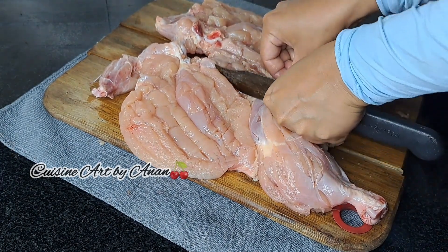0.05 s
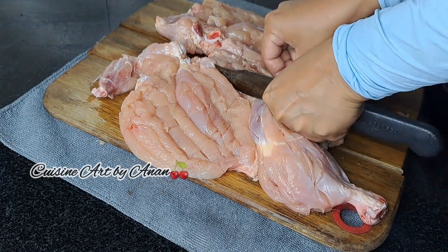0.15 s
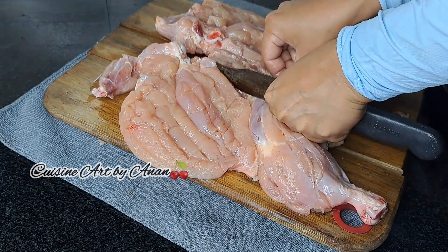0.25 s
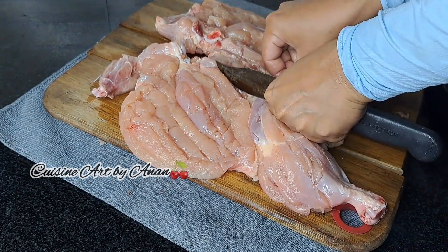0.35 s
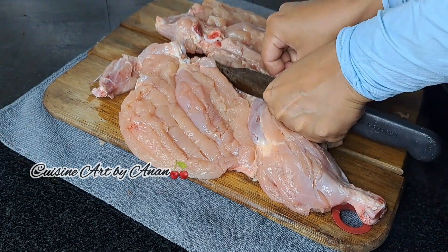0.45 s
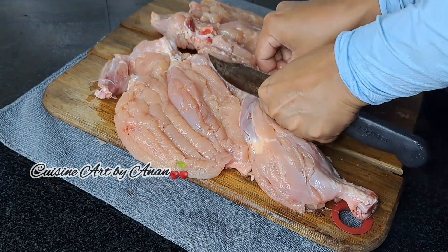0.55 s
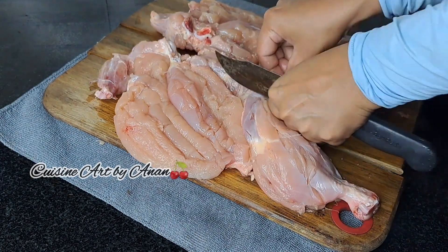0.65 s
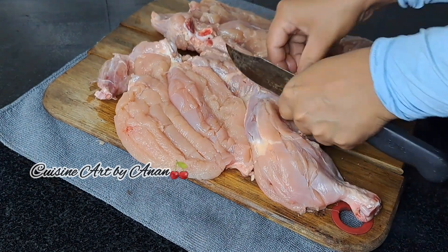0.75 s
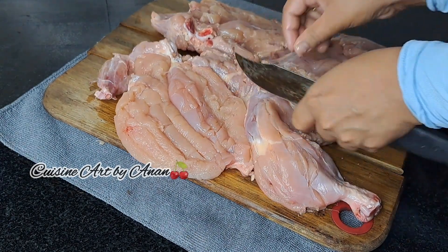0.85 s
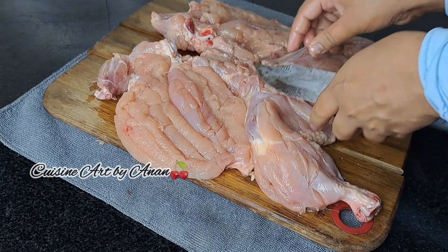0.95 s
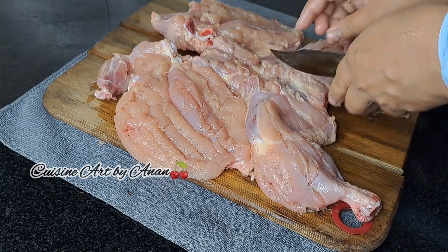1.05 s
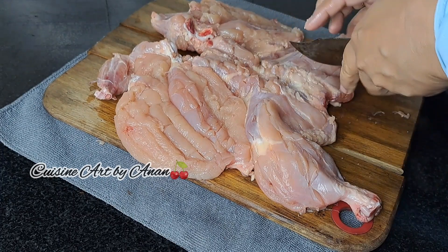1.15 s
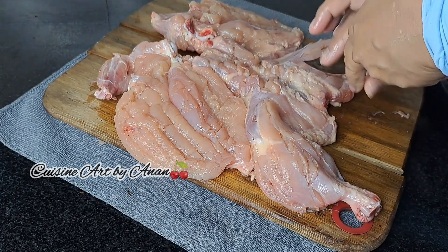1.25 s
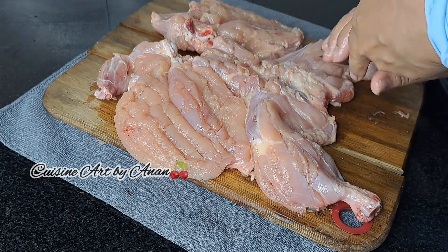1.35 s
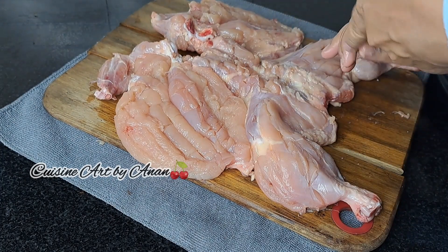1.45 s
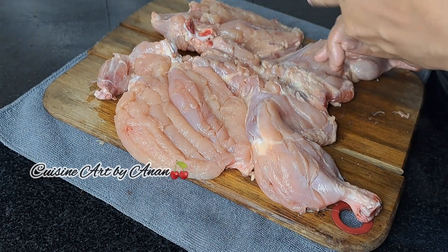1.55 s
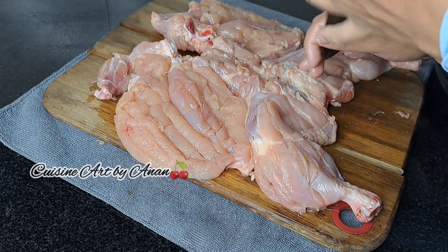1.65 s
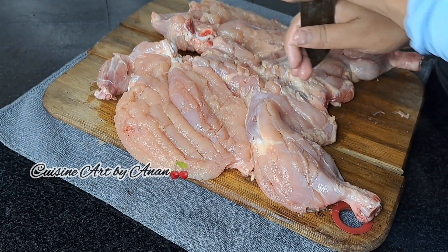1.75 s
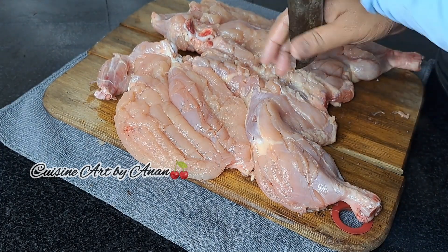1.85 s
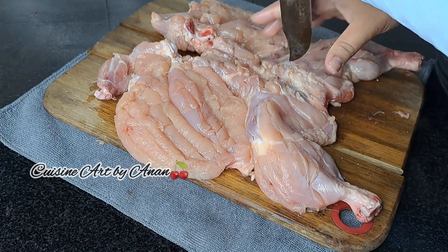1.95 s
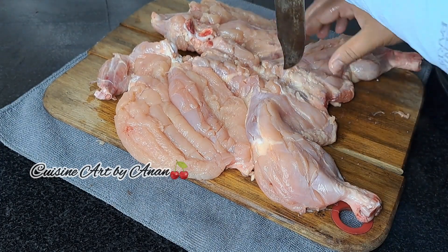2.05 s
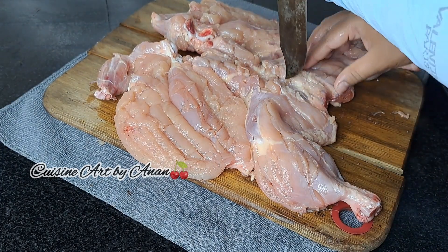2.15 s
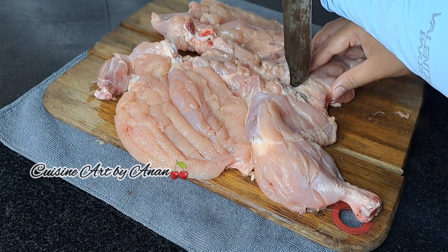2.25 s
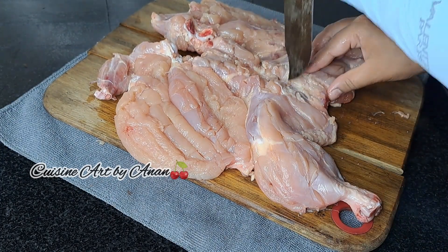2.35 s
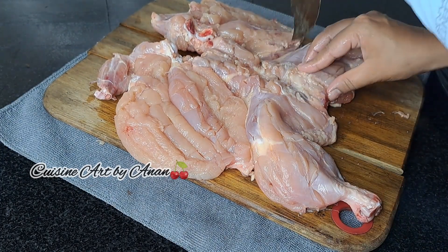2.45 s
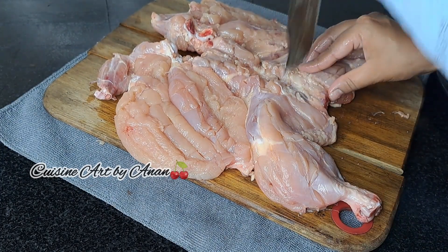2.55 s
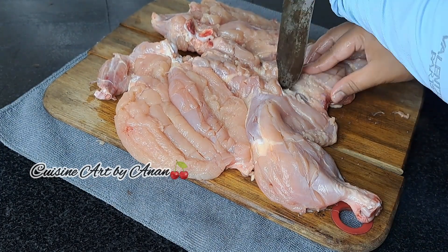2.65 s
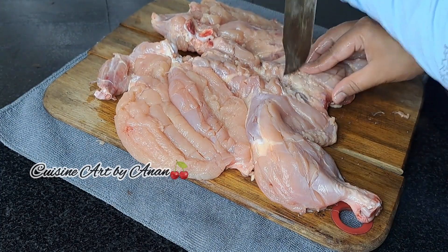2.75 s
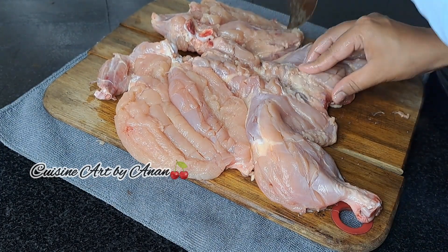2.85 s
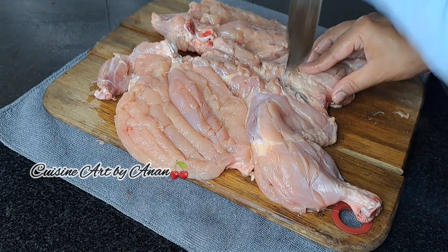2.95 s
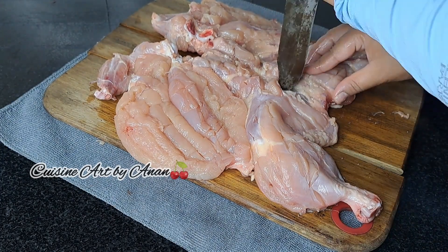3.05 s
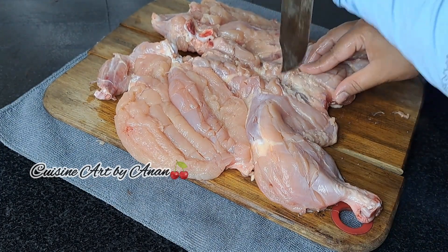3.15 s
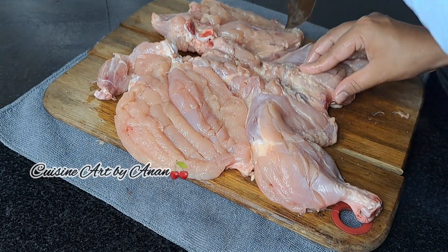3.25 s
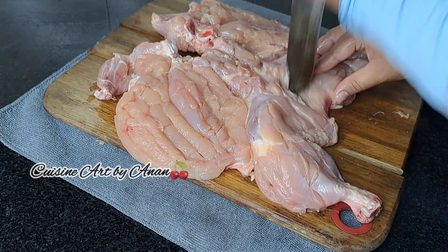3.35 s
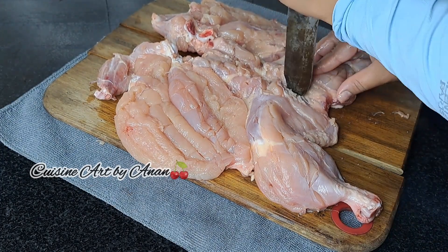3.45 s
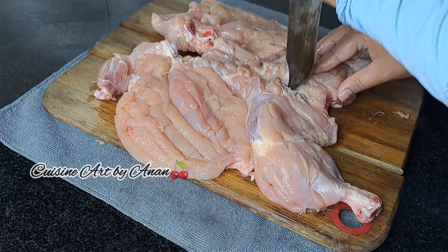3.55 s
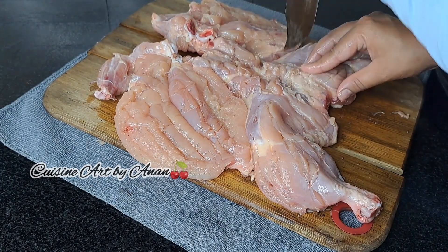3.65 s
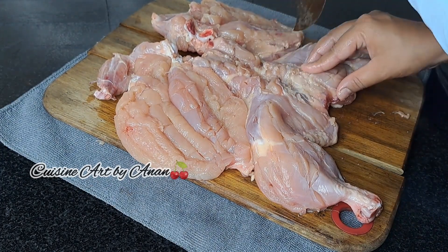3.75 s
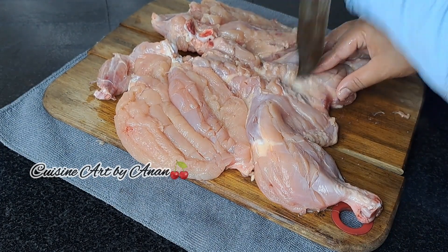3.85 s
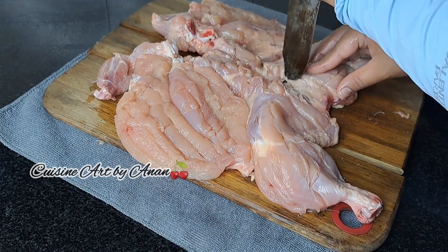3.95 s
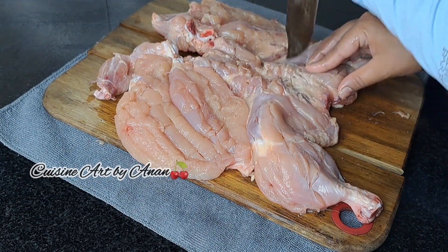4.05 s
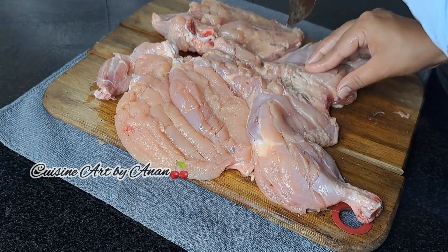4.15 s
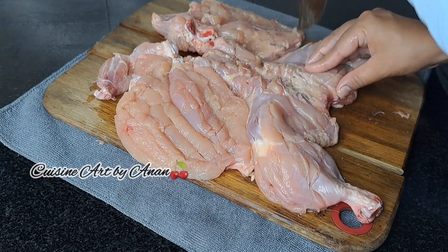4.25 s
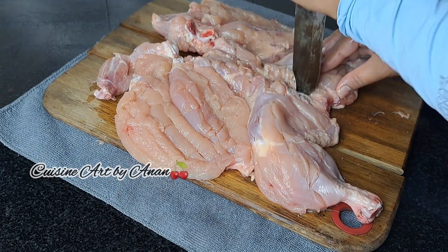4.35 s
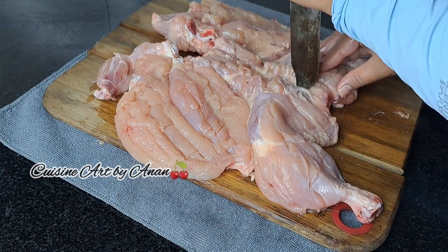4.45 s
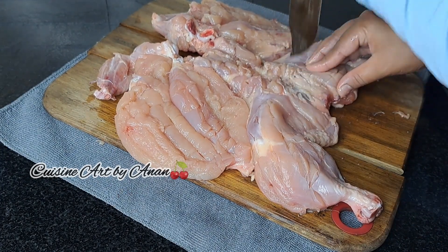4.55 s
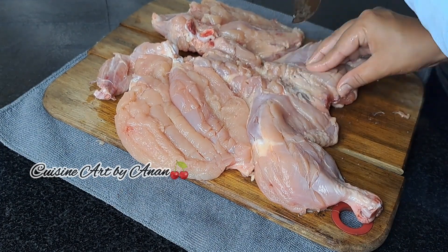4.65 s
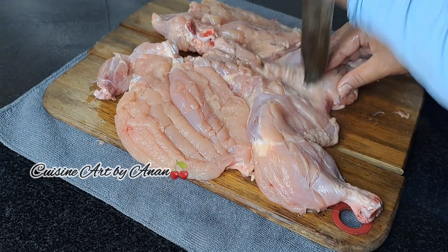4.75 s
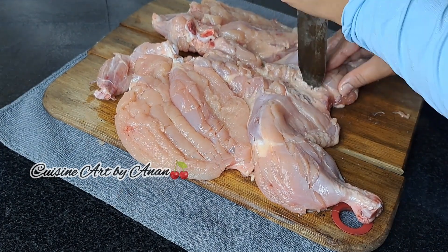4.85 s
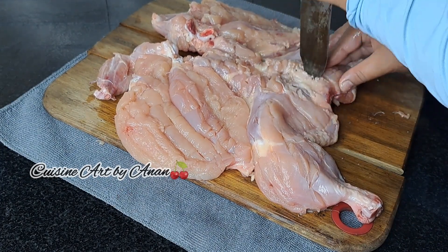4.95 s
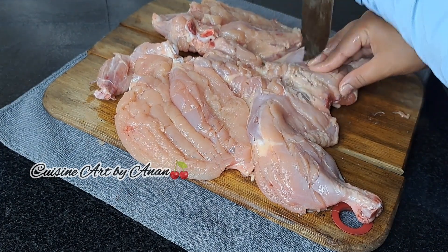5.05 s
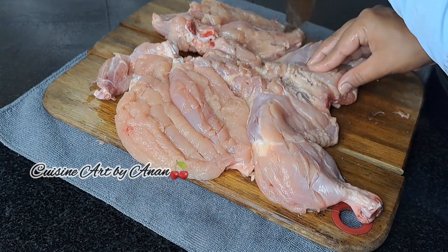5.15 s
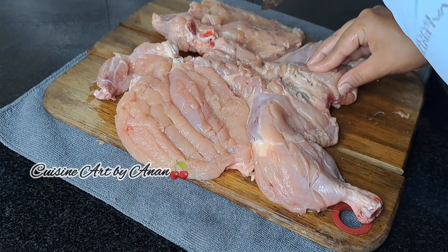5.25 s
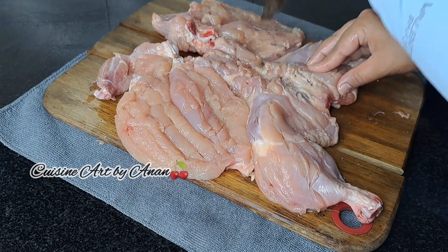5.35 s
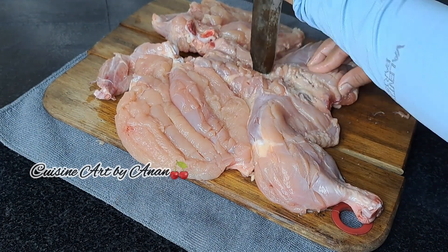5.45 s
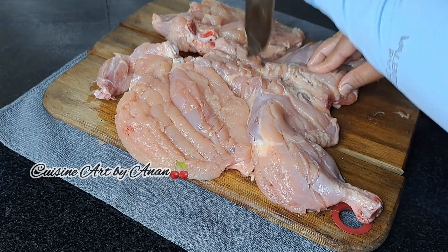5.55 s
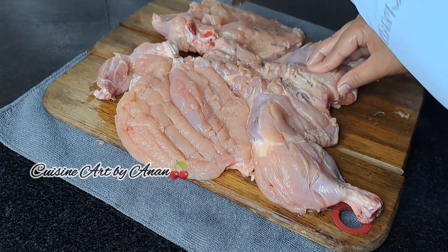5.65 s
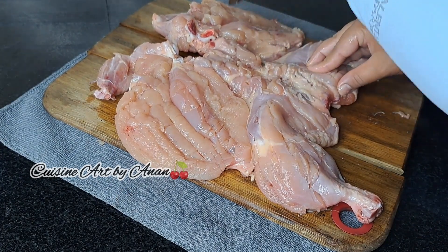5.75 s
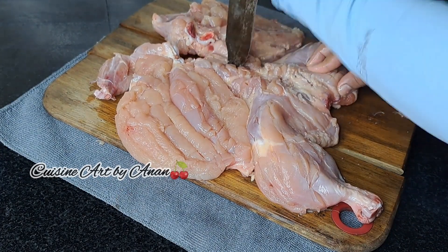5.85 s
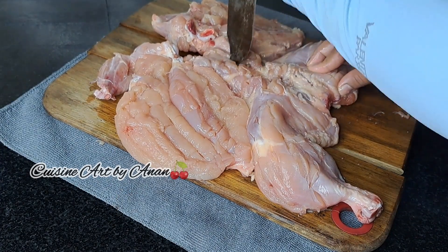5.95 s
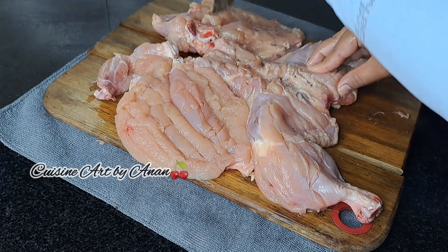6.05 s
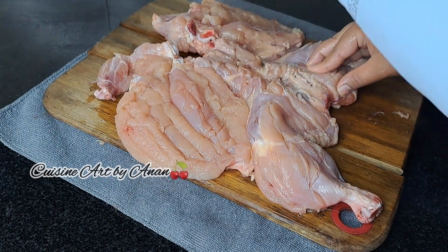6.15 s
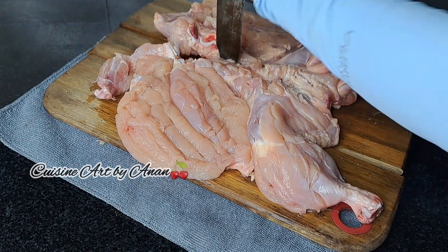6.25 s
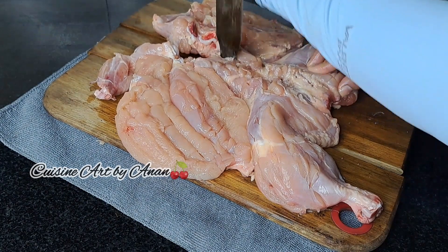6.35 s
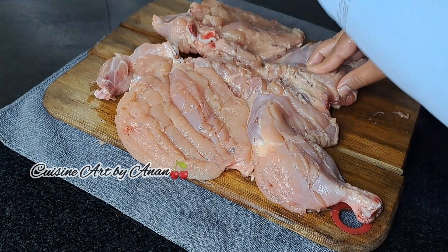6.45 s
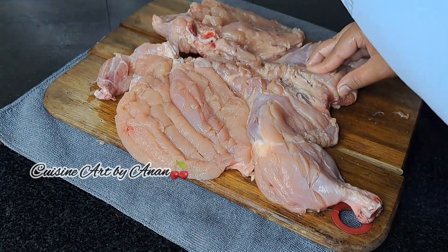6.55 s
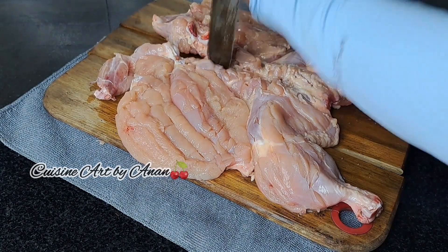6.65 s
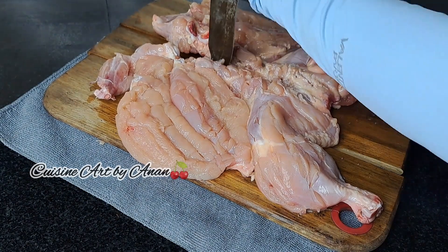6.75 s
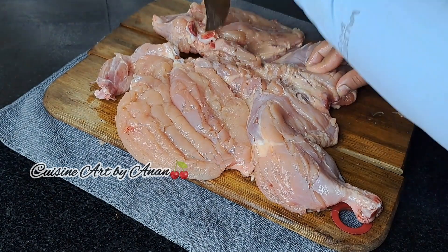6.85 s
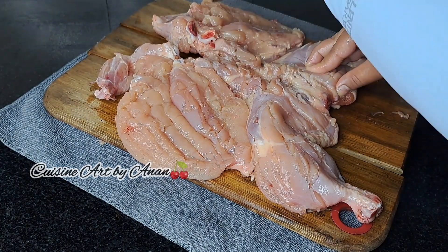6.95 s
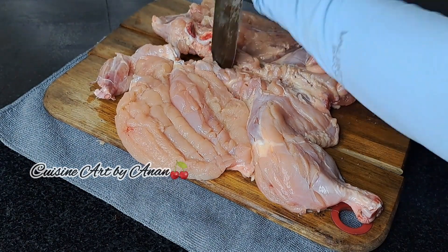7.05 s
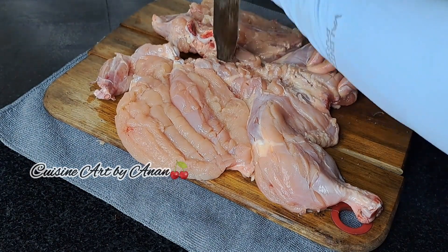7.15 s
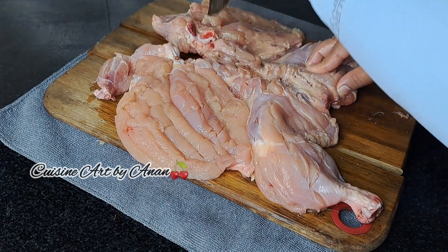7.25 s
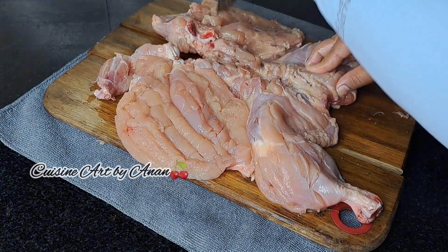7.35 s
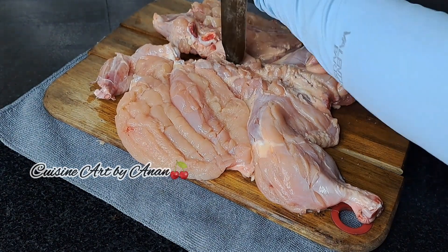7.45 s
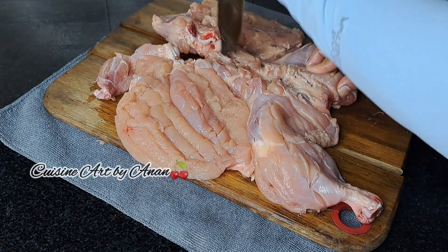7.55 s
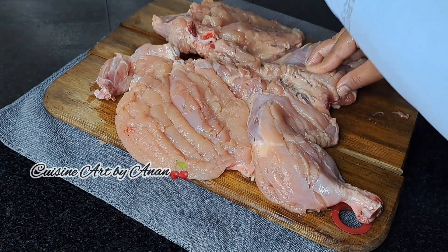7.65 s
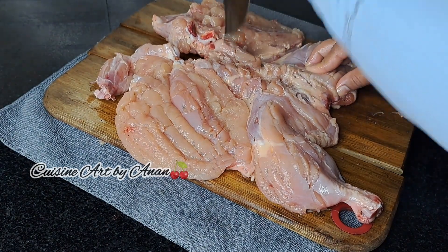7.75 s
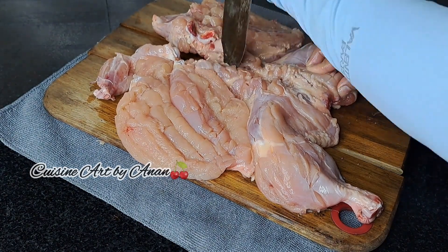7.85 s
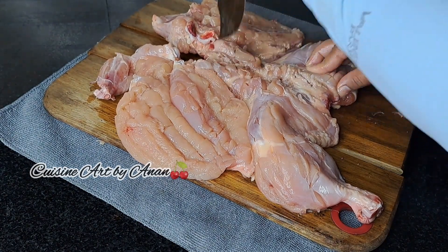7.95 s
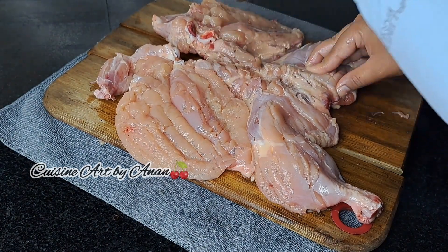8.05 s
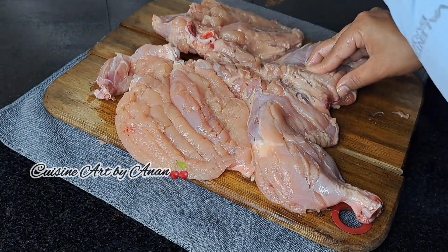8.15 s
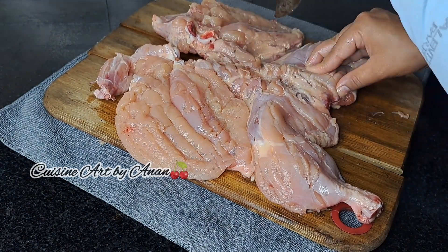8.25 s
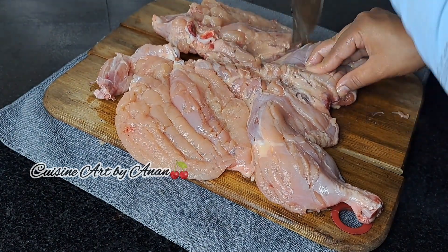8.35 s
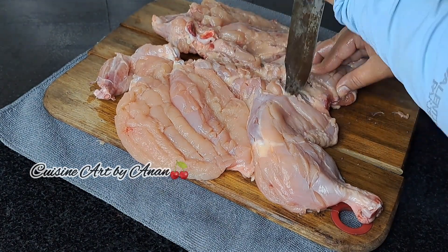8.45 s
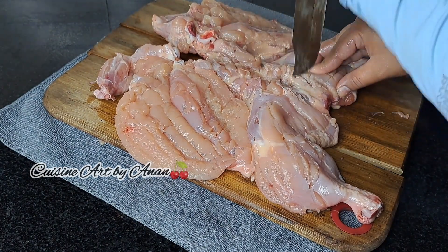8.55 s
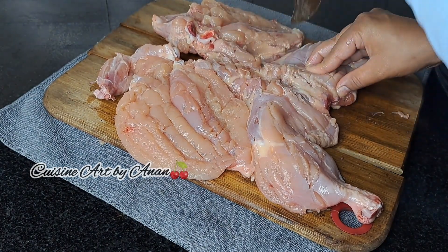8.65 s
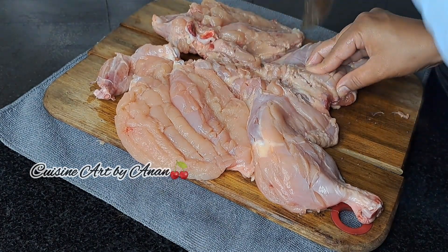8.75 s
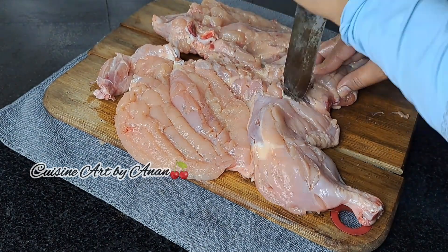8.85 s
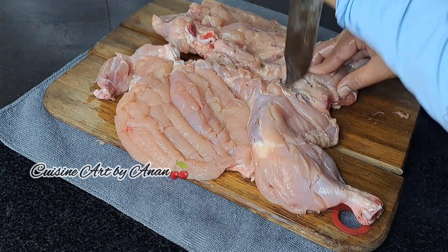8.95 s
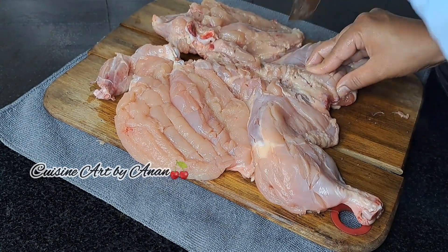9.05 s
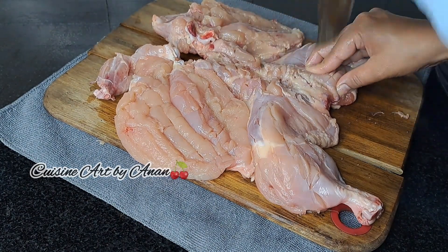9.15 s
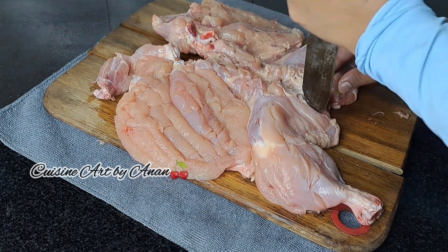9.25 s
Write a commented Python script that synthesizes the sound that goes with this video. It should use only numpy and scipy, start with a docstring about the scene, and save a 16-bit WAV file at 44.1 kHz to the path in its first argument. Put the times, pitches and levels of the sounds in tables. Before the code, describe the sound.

Nearly quiet at first, with high cricket chirps and delicate moist handling of meat. From about two and a half seconds, sixteen sharp chops land fairly steadily, some light, some loud enough to dominate everything. Each slaps flesh, tears wetly and knocks the wooden board, making the worktop boom briefly. Bone snaps and a short blade rasp add detail. The pickup is close, in a reflective kitchen, with distant motor rush behind.

```python
"""Knife work on raw chicken in a hard-walled kitchen, dry sounds plus worktop modes and noise-built reverberation.
From the start: soft swells of hiss and wet pops, skin ticks, a soft flop; faint insects, a distant motor's rush.
From 2.6 s: about 2.3 blows a second, each a flesh slap, crunching grains and a board thud with a blade clack.
Some blows add bone cracks or ringing bone. A low hum picks up about halfway, with an uneven level, and the
blade rasps free. Insects are falling whistles and bands of noise."""
import sys
import numpy as np
from scipy import signal
from scipy.fft import rfft, irfft, next_fast_len
from scipy.io import wavfile

SR = 44100
rng = np.random.default_rng(int(sys.argv[2]) if len(sys.argv) > 2 else 0)


def unload_wav(signal):
    """Save mono or channel-first audio to the path in sys.argv[1] as 16-bit WAV at rate SR, clipped to [-1, 1]."""
    wavfile.write(
        sys.argv[1],
        SR,
        np.round(np.clip(np.atleast_2d(signal).T, -1, 1) * 32767).astype(np.int16),
    )


N = 410571
TIME_S = np.arange(N) / SR


def undb(db):
    """Decibels to amplitude gain."""
    return 10 ** (np.asarray(db) / 20)


def unit(x):
    """Scale to rms 1."""
    return x / np.sqrt(np.mean(x ** 2) + 1e-20)


def add(track, s, sound):
    """Mix a sound into a track from time s on."""
    i = max(int(s * SR), 0)
    part = track[..., i:i + sound.shape[-1]]
    part += sound[..., :part.shape[-1]]


def colour(x, points):
    """Filter by a spectrum of (Hz, dB) points, interpolated over log frequency."""
    hz, db = np.transpose(points)
    n = next_fast_len(x.shape[-1] + SR // 20)
    f = np.maximum(np.fft.rfftfreq(n, 1 / SR), 1)
    gain = undb(np.interp(np.log(f), np.log(hz), db))
    return irfft(rfft(x, n) * gain, n)[..., :x.shape[-1]]


def resonate(x, hz, width_hz):
    """One resonance, gain 1 at its centre."""
    b, a = signal.iirpeak(min(hz, SR / 2 - 1), hz / min(width_hz, SR / 3), fs=SR)
    return signal.lfilter(b, a, x)


def resonate_twice(x, hz, width_hz):
    """Two equal resonances in series: steeper skirts."""
    return resonate(resonate(x, hz, width_hz), hz, width_hz)


def ring(x, response):
    """Convolve with one impulse response per channel."""
    return signal.fftconvolve(np.atleast_2d(x), response, axes=1)[:, :N]


def spread(pair, likeness):
    """Mix two unrelated signals into left and right with the given correlation."""
    c = np.clip(likeness, -1, 1)
    side = pair[1] * np.array([[1], [-1]])
    return np.sqrt((1 + c) / 2) * pair[0] + np.sqrt((1 - c) / 2) * side


def noise(n, likeness):
    """Stereo white noise with the given correlation."""
    return spread(rng.standard_normal((2, n)), likeness)


def grains(length_s, rate_hz, scatter_db):
    """Tiny ruptures of very unequal size, at the same instants in both channels."""
    n = int(length_s * SR)
    size = undb(scatter_db * np.minimum(rng.exponential(size=n), 4))
    happens = rng.random(n) < rate_hz / SR
    return unit(size * happens * rng.standard_normal((2, n)))


def buzz(n, hz, width_hz):
    """A steep band of noise, rms 1: many wing strokes blurred by distance."""
    return unit(resonate_twice(rng.standard_normal((2, n)), hz, width_hz))


def swelling(hz):
    """Slow random level curve around the given rate, rms 1."""
    return unit(resonate_twice(rng.standard_normal(N), hz, hz))


def thud(hz):
    """Pressure from a short push on the board: dip, crest, dip; centred in 20 ms."""
    a = (np.pi * hz * (np.arange(SR // 50) / SR - 1 / 100)) ** 2
    return (1 - 2 * a) * np.exp(-a)


# blows: (board contact t/s, time in meat/s, thud peak level/dB, thud f/Hz,
#         gristle crunch level/dB, wet crackle level/dB)
BLOWS = [(2.6177, .008, -27.5, 222, -43, -49), (3.0147, .009, -13.5, 354, -38.5, -49.5),
         (3.4068, .018, -1, 374, -31.5, -28), (3.9064, .013, -22, 314, -42.5, -45),
         (4.3633, .009, -8, 355, -26.5, -34.5), (4.8138, .027, -13.5, 333, -30.5, -35.5),
         (5.459, .02, -20, 337, -34.5, -41), (5.885, .007, -13.5, 279, -33.5, -41.5),
         (6.286, .014, -2, 354, -28, -40), (6.7036, .006, -5.5, 352, -28.5, -58),
         (7.0819, .009, -18, 302, -36, -37), (7.4624, .017, -2, 372, -51.5, -39),
         (7.8529, .017, -20.5, 386, -39.5, -65), (8.4603, .006, -27, 284, -39.5, -42.5),
         (8.8655, .014, -13.5, 294, -30, -34), (9.259, .01, -3, 340, -26.5, -39.5)]
# thick bones checking the blade: (t/s, knock peak level/dB, knock f/Hz, ring level/dB, ring f/Hz)
THICK_BONES = [(4.798, -15.5, 460, -32.5, 714), (5.4482, -18, 272, -33.5, 1496),
               (8.8585, -13, 444, -34.5, 1220)]
# blade resonances, damped by meat: (f/Hz, width/Hz, level/dB)
BLADE_MODES = [(733, 410, 5), (1457, 715, 2.5), (2220, 660, 3), (3000, 600, -5.5), (4500, 4300, -12)]
# clack level under a full-scale thud; clack dB per thud dB (above 1: hard blows are brighter)
CLACK_DB, CLACK_GROWTH = -21, 1.61


def knocks(clack_s=0.0011, lead_s=.0015):
    """Board or bone stops the edge: a thud pulse, and contact noise rings the blade, more so when hard."""
    out, t = np.zeros((2, N)), np.arange(SR // 25) / SR
    stops = [(s, db, hz) for s, _, db, hz, _, _ in BLOWS] + [bone[:3] for bone in THICK_BONES]
    for s, db, hz in stops:
        add(out, s - 1 / 100, undb(db) * thud(hz))
        contact = noise(len(t), 0.27) * np.exp(-t / clack_s)
        clack = sum(undb(g) * resonate_twice(contact, f, w) for f, w, g in BLADE_MODES)
        clack = clack / clack[:, :SR // 200].std()  # rms 1 over first 5 ms
        add(out, s - lead_s, clack * undb(CLACK_DB + CLACK_GROWTH * db))
    return out


# gristle tearing spectrum: (f/Hz, level/dB per Hz)
CRUNCH_SPECTRUM = [(200, -2.5), (600, 8), (1000, 1.5), (1400, 3.5), (2500, -8), (4000, -20), (8000, -26.5)]
# wet tearing spectrum: (f/Hz, level/dB per Hz)
CRACKLE_SPECTRUM = [(1500, -9), (3500, -2), (5500, -4.5), (7800, 2), (10000, -5), (15500, -5.5)]
SLAP_DB, SLAP_GROWTH = -7, 0.55  # slap at 0 dB mean tearing; slap dB per tearing dB


def cuts(slap_hz=540, slap_t60_s=0.031, build_db=5, release_s=0.0069):
    """The edge slaps flesh, louder where tough, then tears fibres harder and harder until it stops."""
    out, t = np.zeros((2, N)), np.arange(SR // 10) / SR
    for lands_s, length_s, _, _, gristle_db, wet_db in BLOWS:
        s = lands_s - length_s
        slap_db = SLAP_DB + SLAP_GROWTH * (gristle_db + wet_db) / 2
        hz = slap_hz * (1 + .06 * rng.standard_normal())
        slap = np.sqrt(2) * np.sin(2 * np.pi * hz * t) * undb(-60 * t / slap_t60_s)
        add(out, s, -slap * (1 - np.exp(-t / 0.00055)) * undb(slap_db))
        build = undb(build_db * (np.minimum(t / length_s, 1) - 1))
        force = build * np.exp(-np.maximum(t - length_s, 0) / release_s)
        for spectrum, db in (CRUNCH_SPECTRUM, gristle_db), (CRACKLE_SPECTRUM, wet_db):
            tearing = unit(colour(spread(grains(1 / 10, 9000, 3.1), 0.38), spectrum))
            add(out, s, tearing * force * undb(db))
    return out


# bone splinters: (t/s, level/dB)
BONE_SNAPS = [(2.6147, -38), (3.013, -40.5), (3.401, -33), (3.9091, -33.5), (4.8, -33), (5.4565, -34.5),
              (7.083, -32), (7.851, -31.5), (8.463, -40), (8.861, -26.5)]
# wet skin coming unstuck: (t/s, level/dB)
SKIN_TICKS = [(.577, -50.5), (.675, -49), (.79, -55.5), (3.583, -49), (6.43, -50.5), (8.512, -46.5)]
SNAP_HZ, TICK_HZ = 8300, 8100


def snaps(decay_s=0.0027, relative_width=0.57):
    """Bone gives way, or wet skin lets go: a decaying noise burst in a broad high resonance."""
    out, t = np.zeros((2, N)), np.arange(SR // 100) / SR
    for events, hz in (BONE_SNAPS, SNAP_HZ), (SKIN_TICKS, TICK_HZ):
        for s, db in events:
            burst = noise(len(t), 0.33) * np.exp(-t / decay_s)
            crack = resonate(burst, hz, relative_width * hz)
            crack = crack / crack[:, :SR // 400].std()  # rms 1 over first 2.5 ms
            add(out, s, crack * undb(db))
    return out


def scrape(length_s, hz, width_hz, rate_hz=2200, scatter_db=4, taper=.5):
    """Stick and slip in one resonance, swelling and fading."""
    slips = resonate_twice(spread(grains(2 * length_s, rate_hz, scatter_db), 0.84), hz, width_hz)
    slips = slips[:, -int(length_s * SR):]  # drop filter onset
    return unit(slips) * signal.windows.tukey(slips.shape[1], min(taper, 1))


# rasp of the blade pulled from bone: (f/Hz, width/Hz, level/dB)
RASP_BANDS = [(1300, 1100, -56.5), (3770, 1200, -57), (8500, 10000, -45)]
PULL_S, PULL_LENGTH_S = 4.992, 0.062
BONE_DECAY_S, BONE_WIDTH_HZ, BONE_GRIT_DB = .018, 300, 0


def grinding(rate_hz=3000, scatter_db=2):
    """Steel grinds into thick bones, which ring as tone plus grit; it rasps once when pulled free."""
    out, t = np.zeros((2, N)), np.arange(SR // 10) / SR
    for s, _, _, db, hz in THICK_BONES:
        grit = resonate_twice(spread(grains(1 / 5, rate_hz, scatter_db), 0.65), hz, BONE_WIDTH_HZ)
        grit = unit(grit[:, -len(t):])  # drop filter onset
        bone = np.sin(2 * np.pi * hz * t) + undb(BONE_GRIT_DB) * grit
        envelope = (1 - np.exp(-t / 0.00082)) * np.exp(-t / BONE_DECAY_S)
        add(out, s, bone * envelope * undb(db))
    for hz, width_hz, db in RASP_BANDS:
        add(out, PULL_S, scrape(PULL_LENGTH_S, hz, width_hz) * undb(db))
    return out


# soft swells of hiss and wet pops: (t/s, length/s, level/dB, centre f/Hz)
SOFT_SWELLS = [(0, 0.27, -68.5, 10900), (.34, .15, -69, 2530), (0.491, .21, -61, 1620),
               (.72, .52, -61.5, 380), (1.342, .13, -68.5, 1590), (1.678, .42, -70, 8750)]
# pop spectrum: (f/Hz, level/dB per Hz)
SQUELCH_SPECTRUM = [(60, -17), (150, -6), (450, 1.5), (1700, -3.5), (4000, -7), (15000, -10)]
FLOP_S, FLOP_DB, FLOP_HZ = .66, -47, 202


def swells_and_flop(rate_hz=2400, scatter_db=4.0, squish_db=9, relative_width=.6):
    """Dense tiny pops in one resonance make soft swells of hiss and wet pops; the meat flops once, softly."""
    out = np.zeros((2, N))
    for s, length_s, db, hz in SOFT_SWELLS:
        pops = colour(grains(length_s, rate_hz, scatter_db), SQUELCH_SPECTRUM)
        pops = pops + undb(squish_db) * resonate(pops, hz, relative_width * hz)
        add(out, s, unit(pops) * signal.windows.tukey(pops.shape[1], .8) * undb(db))
    add(out, FLOP_S - 1 / 100, undb(FLOP_DB) * thud(FLOP_HZ))
    return out


# modes of board, worktop and room bass: (f/Hz, relative level/dB, t60/s)
WORKTOP_MODES = [(63, -6.5, .6), (81.7, -9, 0.84), (101.8, -3.5, 0.93), (160.9, 2.5, 0.4),
                 (203, -3.5, 0.36), (233.7, 3.5, 0.34), (253.3, -2.5, 0.47), (294, 2.5, 0.4),
                 (324, -12, 0.84), (355, -1.5, 0.44), (425, 15, 0.039), (429, -11.5, 0.11),
                 (471, -2.5, 0.17), (484, 0.5, 0.44), (520.5, 0.5, 0.43), (556, -4, 0.52),
                 (685, -3.5, 0.52), (773, -5, 0.37), (821, -2.5, 0.75)]


def worktop(x, ring_db=-58, place_db=3, rise_s=0.0019, side_db=-9):
    """Modes ring on; each blow's new spot reweights them, the higher ones more unlike at each side."""
    t, out = np.arange(SR) / SR, np.zeros((2, N))
    hz, db, t60_s = np.transpose(WORKTOP_MODES)[:, :, None]
    decay = undb(ring_db + db - 60 * t / t60_s) * (1 - np.exp(-t / rise_s))
    modes = decay * np.exp(2j * np.pi * hz * t)
    count = len(modes)
    starts = [0] + [int(blow[0] * SR) - SR // 20 for blow in BLOWS] + [N]
    for a, b in zip(starts, starts[1:]):
        weights = undb(place_db * rng.uniform(-1, 1, count)) * np.exp(2j * np.pi * rng.random(count))
        side_phase = np.exp(2j * np.pi * rng.random(count))
        side = undb(side_db) * np.minimum(hz.T / 300, 1) ** 2 * side_phase
        stereo_weights = weights * (1 + side * np.array([[1], [-1]]))
        response = (stereo_weights @ modes).imag
        add(out, a / SR, signal.fftconvolve(x[:, a:b], response, axes=1))
    return out


# reverberation bands: (centre f/Hz, relative level/dB, t60/s)
KITCHEN_BANDS = [(60, 6.5, 0.4), (142, -8.5, 0.95), (296, -9, 0.78), (604, -3, 0.5), (1180, 0, 0.53),
                 (2314, 2.5, 0.52), (4280, 2.5, 0.5), (7900, -5.5, 0.53), (13760, 1, 0.39)]


def kitchen(x, wet_db=-2, alike_hz=520, build_s=0.0023, early=0.75, early_s=0.0075):
    """Strong early reflections off worktop and tiles, then a diffuse tail; only bass is alike at both sides."""
    t, response = np.arange(SR) / SR, 0
    centres_hz = np.array(KITCHEN_BANDS)[:, 0]
    edges_hz = [30, *np.sqrt(centres_hz[1:] * centres_hz[:-1]), SR / 2 - 1]
    for (hz, db, t60_s), low, high in zip(KITCHEN_BANDS, edges_hz, edges_hz[1:]):
        fade = undb(-60 * t / t60_s) * (1 - np.exp(-t / build_s)) * (1 + early * np.exp(-t / early_s))
        tail = noise(SR, 1 / (1 + (hz / alike_hz) ** 2)) * fade
        band = signal.sosfilt(signal.butter(3, [low, high], "band", fs=SR, output="sos"), tail)
        response = response + unit(band) * undb(db) * np.sqrt(2 * (high - low)) / SR
    return undb(wet_db) * ring(x, response)


# microphone colour: (f/Hz, left minus right level/dB)
BALANCE = [(100, -.6), (380, -1.8), (700, -3), (1300, -3.3), (4400, -4.5), (8000, -.2), (14000, 2)]


def microphones(x, delay_samples=2):
    """Each microphone has its own colour; the right one hears the board slightly later."""
    left = colour(x[0], [(hz, db / 2) for hz, db in BALANCE])
    right = colour(x[1], [(hz, -db / 2) for hz, db in BALANCE])
    return np.array([left, np.pad(right, (delay_samples, 0))[:N]])


# one wing stroke: (t/s, f/Hz, level/dB)
CHIRP = [(0, 9760, -98), (.012, 9580, -72), (.024, 9350, -61), (.033, 9220, -66), (.037, 9080, -75),
         (.043, 8940, -66), (.052, 8880, -96)]
# strokes heard per phrase: (count); 0 adds a silent gap
PHRASE_STROKES = [5, 2, 5, 3, 3, 6, 8, 3, 4, 3, 3, 2, 2, 3, 6, 4, 0, 0, 5, 5, 5]
CRICKET_START_S, STROKE_S, GAP_S = -.008, .09435, .09485


def cricket(peak_s=0.02):
    """Each wing stroke is a short falling whistle with a noisy band; the strokes keep a steady beat."""
    out, t = np.zeros((2, N + SR)), np.arange(int(CHIRP[-1][0] * SR)) / SR  # 1 s lead-in, cut below
    times_s, pitch_hz, level_db = np.transpose(CHIRP)
    s = CRICKET_START_S
    for count in PHRASE_STROKES:
        for _ in range(count):
            hz = np.interp(t, times_s, pitch_hz) + 25 * rng.standard_normal()
            whistle = np.sqrt(2) * np.sin(2 * np.pi * np.cumsum(hz) / SR)
            stroke = whistle + .4 * buzz(len(t), hz.mean(), 600)
            db = np.interp(t, times_s, level_db) + 2.3 * rng.standard_normal()
            add(out, 1 + s - peak_s, stroke * undb(db))
            s += STROKE_S
        s += GAP_S
    return out[:, SR:]


# another insect's bouts: (t/s, buzz count, level/dB)
BOUTS = [(2.499, 2, -65.5), (6.71, 4, -62)]
BUZZ_EVERY_S, BUZZ_S, BUZZ_HZ = 0.27, 0.29, 4770
TRAIL_S, TRAIL_HZ, TRAIL_DB = 1.45, 4496, -10.5  # TRAIL_DB relative to the buzzes


def insects(buzz_width_hz=520, trail_width_hz=620):
    """Bouts of even narrow-band buzzes, each bout trailing off lower and softer."""
    out = np.zeros((2, N))
    for s, count, db in BOUTS:
        notes = [(BUZZ_EVERY_S * k, BUZZ_S, BUZZ_HZ, buzz_width_hz, db) for k in range(round(count))]
        notes.append((BUZZ_EVERY_S * round(count), TRAIL_S, TRAIL_HZ, trail_width_hz, db + TRAIL_DB))
        for delay_s, length_s, hz, width_hz, note_db in notes:
            n = int(length_s * SR)
            envelope = signal.windows.tukey(n, min(.8 * BUZZ_S / length_s, 1))
            add(out, s + delay_s, buzz(n, hz, width_hz) * envelope * undb(note_db))
    return out


# far insect bands: (f/Hz, width/Hz, level/dB)
CHORUS_BANDS = [(3122, 340, -80), (4500, 880, -81), (5790, 210, -81.5), (7350, 1480, -70.5)]


def chorus(swell_db=3.0, swell_hz=1.2, few_width_hz=230):
    """Far insects drone in bands; narrow bands, with few singers, swell and sink more."""
    out = 0
    for hz, width_hz, db in CHORUS_BANDS:
        depth_db = swell_db * min(few_width_hz / width_hz, 1)
        level_db = db + depth_db * swelling(swell_hz)
        out = out + buzz(N, hz, width_hz) * undb(level_db)
    return out


# uneven levels heard of low hum and rushing: (t/s, hum level/dB, rushing level/dB)
HUM_RUSH_LEVELS = [(0, -78, -77.5), (3.8, -73, -81), (4.65, -74.5, -68.5), (5.05, -58.5, -63),
                   (7.4, -58, -62), (7.9, -70, -66), (8.3, -67.5, -59), (9.3, -57, -59.5)]
# rushing spectrum: (f/Hz, level/dB per Hz)
RUSH_SPECTRUM = [(25, -20.5), (50, -14), (90, 4), (130, 0), (200, 0.5), (260, -0.5), (430, 1), (900, -7),
                 (1170, -6.5), (1600, -10), (1740, -0.5), (1880, -12), (3500, -19.5), (8000, -45.5)]
# still air spectrum: (f/Hz, level/dB per Hz)
AIR_SPECTRUM = [(20, -30), (50, -10.5), (110, 2.5), (180, -2.5), (330, 0.5), (600, 0), (1000, -10),
                (1500, -16.5), (2500, -22.5), (4000, -35), (8000, -12.5), (12000, -28.5), (15500, -21)]


def background(air_db=-67, hum_hz=49.5, octave_db=-12, swell_db=3.5, swell_hz=1.4):
    """Still air as coloured noise; a distant motor as rushing noise and a two-partial hum that wavers."""
    air = unit(colour(noise(N, 0.18), AIR_SPECTRUM)) * undb(air_db)
    s, hum_db, rush_db = np.transpose(HUM_RUSH_LEVELS)
    waver = unit(resonate(rng.standard_normal(N), 0.93, 4.7))
    phase = 2 * np.pi * np.cumsum(hum_hz * (1 + .02 * waver)) / SR
    partials = np.sqrt(2) * (np.sin(phase) + undb(octave_db) * np.sin(2 * phase))
    hum = partials * undb(np.interp(TIME_S, s, hum_db) + swell_db * swelling(swell_hz))
    rushing = unit(colour(noise(N, 0.68), RUSH_SPECTRUM)) * undb(np.interp(TIME_S, s, rush_db))
    return air + hum + rushing


def scene():
    """Knife work with its ringing worktop and room, over insects, air and motor."""
    knife = knocks() + cuts() + snaps() + grinding() + swells_and_flop()
    chirps = cricket()
    indoors = microphones(knife + worktop(knife) + kitchen(knife))
    outdoors = chirps + kitchen(chirps, wet_db=-0.5) + insects() + chorus()
    return indoors + outdoors + background()


TOP_HZ = 15900


def record(dry):
    """The recorder clips at full scale, then low-passes steeply."""
    lowpass = signal.ellip(8, .2, 70, TOP_HZ, fs=SR, output="sos")
    return signal.sosfilt(lowpass, np.clip(dry, -1, 1))


dry = scene()
out = record(dry)
unload_wav(out)
```